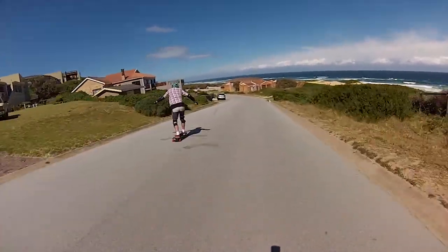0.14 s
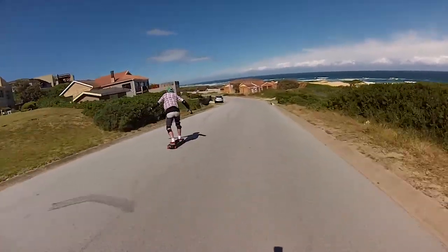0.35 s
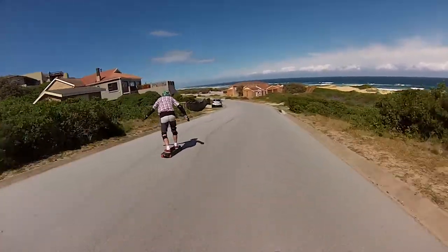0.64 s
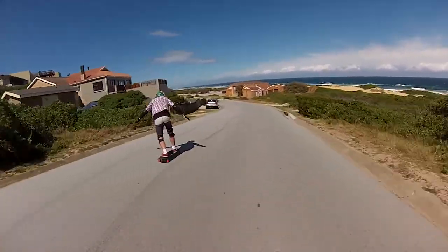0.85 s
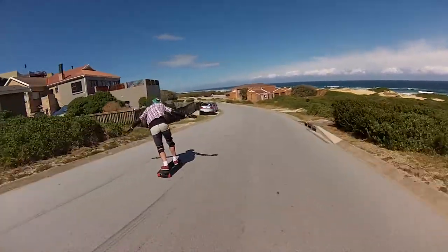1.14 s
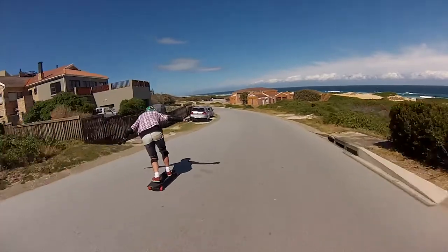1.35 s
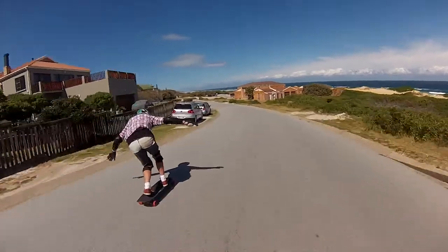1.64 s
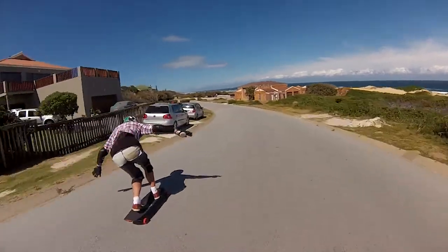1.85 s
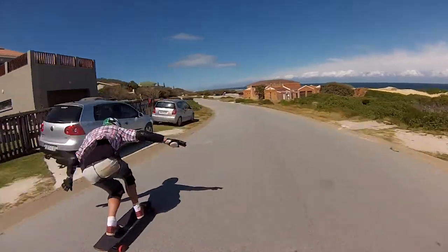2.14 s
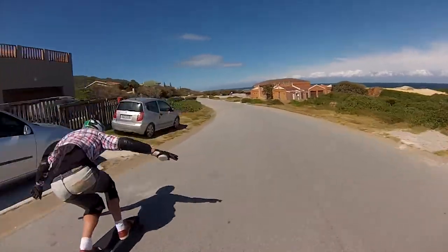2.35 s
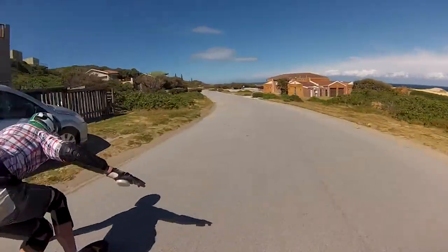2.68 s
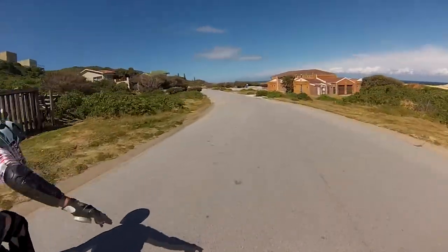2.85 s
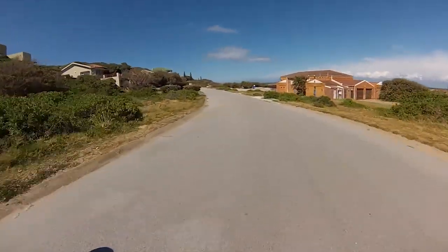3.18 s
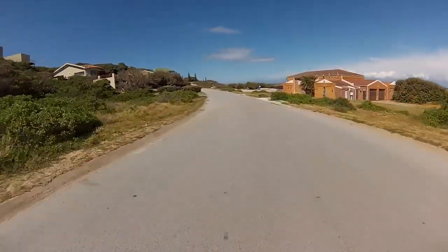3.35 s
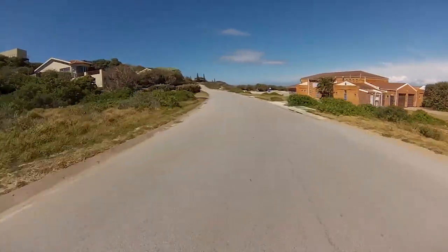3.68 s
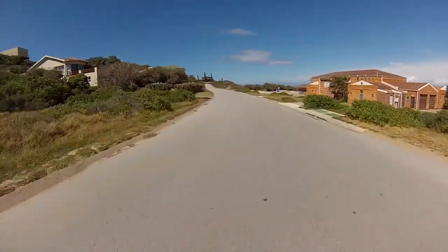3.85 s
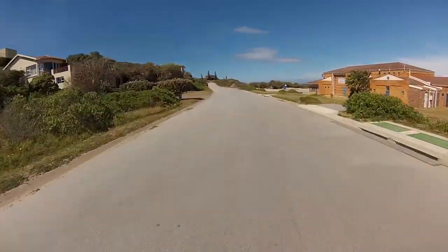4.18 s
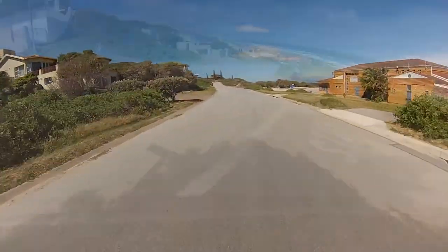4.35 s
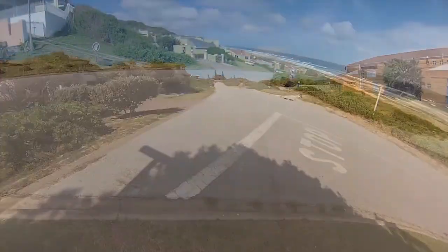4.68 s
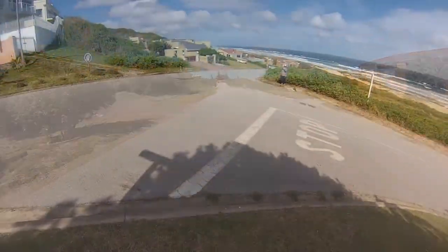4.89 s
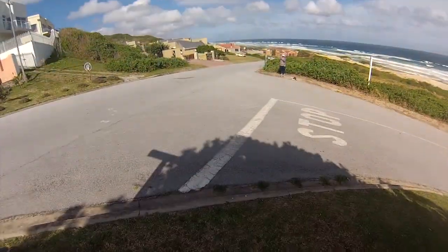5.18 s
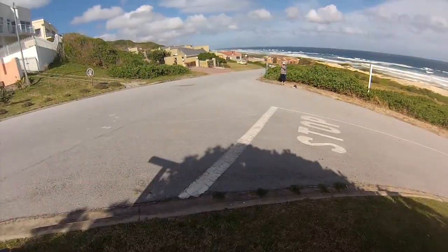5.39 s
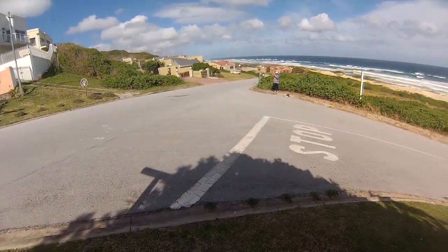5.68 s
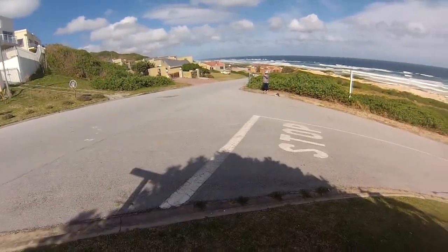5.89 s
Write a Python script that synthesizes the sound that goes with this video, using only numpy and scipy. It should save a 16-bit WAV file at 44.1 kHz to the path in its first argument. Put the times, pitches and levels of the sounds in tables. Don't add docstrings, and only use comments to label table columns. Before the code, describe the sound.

A longboard rumbles and roars over gritty asphalt with buffeting air, then cuts abruptly to a quiet roadside with handling bumps and an approaching board.

```python
import sys
import numpy as np
from scipy import signal
from scipy.fft import rfft, irfft, next_fast_len
from scipy.io import wavfile
from scipy.ndimage import uniform_filter1d

SR = 44100
rng = np.random.default_rng(int(sys.argv[2]) if len(sys.argv) > 2 else 0)


def unload_audio(sound):
    columns = np.transpose(np.atleast_2d(sound))
    steps = np.round(np.clip(columns, -1, 1) * 32767)
    wavfile.write(sys.argv[1], SR, steps.astype(np.int16))


def nominal_scale(level):
    x = np.asarray(level, float) / 20
    return 10 ** x


N = 265482
T = np.arange(N) / SR
SIZE = next_fast_len(N + 8192)
HZ = np.arange(SIZE // 2 + 1) * SR / SIZE + 1e-3
CUT_S = 4.188


def unit(x):
    return x / np.sqrt(np.mean(x ** 2))


def slope(points):
    hz, db = np.transpose(points)
    return nominal_scale(np.interp(np.log(HZ), np.log(hz), db)) ** 2


def ring(peaks, steep=2.):
    return sum(nominal_scale(db) ** 2 / (1 + (2 * (HZ - hz) / width) ** 2) ** steep for hz, width, db in peaks)


def edge(hz, order=4):
    return 1 / (1 + (hz / HZ) ** (2 * order))


def through(x, power):
    ceps = irfft(np.log(power + 1e-14) / 2, SIZE)
    ceps[1:SIZE // 2] *= 2
    ceps[SIZE // 2 + 1:] = 0
    response = np.exp(rfft(ceps))
    return irfft(rfft(x, SIZE) * response, SIZE)[:N]


def walk(rate):
    hold = max(int(SR / rate), 1)
    held = np.repeat(rng.standard_normal(N // 20), hold)[:N]
    return unit(uniform_filter1d(uniform_filter1d(held, hold), hold))


def grit(scatter_db, patchy_db, patch_rate):
    sizes = nominal_scale(scatter_db * rng.exponential(size=N) + patchy_db * walk(patch_rate))
    return unit(sizes * rng.standard_normal(N))


def even(x, share):
    envelope = np.abs(signal.hilbert(x, SIZE)[:N])
    return unit(x / (envelope + 0.94) ** np.clip(share, 0, 1))


def swells(rows, rest_db):
    power = sum(nominal_scale(db) ** 2 * np.exp(-((T - s) / half_s) ** 2) for s, db, half_s in rows)
    return 10 * np.log10(power + nominal_scale(rest_db) ** 2)


def rise(s, rise_s):
    return np.clip((T - s) / rise_s, 0, 1)


def roadside():
    # (frequency [Hz], density [dB per Hz])
    air_colour = [(65, -38), (110, -2.5), (231, -7.5), (271, -13.5), (323, -1), (408, -12.5), (536, -15.5),
                  (1840, -22.5), (2070, -15), (3060, -30), (11800, -34.5), (15300, -73), (22000, -120)]
    # (low edge [Hz], high edge [Hz], swelling [dB])
    bands = [(60, 280, 0.83), (254, 490, 3.3), (450, 1900, 0.47), (1640, 3200, 0.5), (3180, 20000, 0.74)]
    noise, colour = rng.standard_normal(N), slope(air_colour)
    out = 0
    for lo_hz, hi_hz, swell_db in bands:
        band = through(noise, colour * edge(lo_hz, order=6) * (1 - edge(hi_hz, order=6)))
        out = out + band * nominal_scale(swell_db * walk(7))
    return unit(out) * nominal_scale(-54.5) * rise(CUT_S, .02)


def newcomer():
    # (frequency [Hz], density [dB per Hz])
    scrape_colour = [(1120, -50), (1900, -17), (2340, -1), (3050, -8), (3270, -2), (4240, -4), (5170, -0.5),
                     (5840, -13), (6650, -4.5), (8890, -19), (11800, -14), (15300, -56), (22000, -120)]
    # (roll [dB], scrape [dB], spray [dB])
    sliding_db = (-47.5, -43, -54)
    slide_s, flutter_db = 5.865, .8
    ahead_s, loose = T - slide_s, rise(slide_s, .03)
    nearing_db = 11 * ahead_s
    gripping_db = (-56 + nearing_db, -64 + nearing_db, -65.5 + 55 * ahead_s)
    roll_db, slide_db, spray_db = (grip_db + (free_db - grip_db) * loose + flutter_db * walk(20)
                                   for grip_db, free_db in zip(gripping_db, sliding_db))
    scrape = grit(scatter_db=1.4, patchy_db=0.5, patch_rate=70)
    wheels = ring([(1424, 670, -3.5), (580, 250, -11.5), (2450, 630, -12)], steep=2.75)
    colour, high = slope(scrape_colour), edge(6000, order=8)
    roll = unit(through(scrape, wheels)) * nominal_scale(roll_db + 2.5)
    slide = unit(through(scrape, colour * (1 - high))) * nominal_scale(slide_db + 1.0)
    spray = unit(through(scrape, colour * high)) * nominal_scale(spray_db + 5.5)
    return (roll + slide + spray) * rise(CUT_S, .02)


def strokes(grip_share):
    finger_strokes = [
        (4.272, 0.05, -54, -10),
        (4.384, 0.11, -51, -4),
        (4.465, .03, -58, 10),
        (4.51, 0.089, -55, -6),
        (4.58, 0.042, -54, 4),
        (4.625, 0.033, -51.5, 0),
        (4.94, 0.036, -52, 1),
        (4.972, 0.081, -48.5, 4.5),
        (5.118, .07, -56, 3),
    ]
    attack_s, release_s, sag_db_per_s = .02, .035, -26
    out = 0
    for s, hold_s, db, grip_db in finger_strokes:
        level = nominal_scale(db + grip_share * grip_db + sag_db_per_s * (T - s).clip(0, 1))
        out = out + level * rise(s, attack_s) * (1 - rise(s + hold_s, release_s)) ** 2
    return out


def handling():
    # (frequency [Hz], width [Hz], level [dB])
    case_modes = [(334, 40, 6.5), (643, 140, -1.5), (1250, 420, -5), (2020, 330, -0.5), (2540, 170, -5),
                  (3740, 210, -20), (4310, 99, -22), (5320, 140, -24)]
    # (frequency [Hz], density [dB per Hz])
    shell_colour = [(150, -9), (450, -25), (850, -35), (1700, -11), (2900, -9.5), (3400, -28), (5000, -33),
                    (6000, -39), (11000, -61)]
    # (time [s], peak [dB], snap against body [dB], time to fall 60 dB [s], lowest frequency [Hz])
    case_ticks = [
        (4.255, -25, -34, .03, 300),
        (4.266, -34, -8, .014, 1800),
        (4.751, -62, 2, .012, 5000),
        (5.109, -30, -24, .016, 1800),
    ]
    # (time [s], peak [dB], pitch [Hz], half length [s])
    chirp_shape = (4.815, -54, 2050, .016)
    slip = grit(scatter_db=1.5, patchy_db=1.6, patch_rate=54)
    body = ring(case_modes, steep=1.9) + slope(shell_colour)
    low, mid, high = edge(610), edge(1340, order=8), edge(3600, order=8)
    boom = unit(through(slip, body * (1 - low))) * nominal_scale(2.5) * strokes(grip_share=.99)
    hollow = unit(through(slip, body * low * (1 - mid))) * nominal_scale(-0.5 + 1.8 * walk(15)) * strokes(grip_share=.2)
    rub = unit(through(slip, body * mid * (1 - high))) * nominal_scale(1.2 * walk(21.89)) * strokes(grip_share=0)
    squeak = unit(through(slip, body * high)) * nominal_scale(-8.5) * strokes(grip_share=-0.49)
    out = boom + hollow + rub + squeak

    noise = rng.standard_normal(N)
    snap = unit(through(noise, edge(5800)))
    struck = body + nominal_scale(-24) ** 2 * (1 - edge(5600, order=8))
    for s, db, top_db, t60, low_hz in case_ticks:
        burst = unit(through(noise, struck * edge(low_hz)))
        since = (T - s).clip(0)
        out = out + np.clip(since / 0.0012, 0, 1) * nominal_scale(db - 60 * since / t60) * (burst + nominal_scale(top_db) * snap)

    s, db, hz, half_s = chirp_shape
    return out + nominal_scale(db) * np.exp(-((T - s) / half_s) ** 2) * np.sin(2 * np.pi * hz * T)


def mount():
    # (time [s], level [dB], half length [s])
    breeze_puffs = [(4.29, -22.5, 0.073), (4.5, -28, 0.026), (4.63, -30.5, 0.033), (4.79, -31.5, 0.098),
                    (4.98, -29, 0.064), (5.09, -31, 0.023), (5.18, -24.5, 0.026), (5.32, -31.5, 0.055),
                    (5.45, -35.5, 0.11), (5.69, -27.5, 0.061), (5.84, -41, 0.03)]
    # (time [s], level [dB], half length [s])
    hand_jolts = [(4.3, -35, 0.024), (4.52, -29, .03), (4.62, -31, 0.019), (4.95, -33.5, .05),
                  (5.04, -35, 0.055), (5.13, -41, .03), (5.21, -34, 0.022), (5.39, -46, 0.044),
                  (5.57, -48, .02), (5.67, -43.5, 0.034), (5.88, -50, .04)]
    # (time [s], peak [dB], push [s], press [dB], press lead [s])
    knock_shape = (4.2665, -8, .0036, -15, .009)
    sway_db, jolt_db = swells(breeze_puffs, rest_db=-40), swells(hand_jolts, rest_db=-53)
    s, db, push_s, press_db, lead_s = knock_shape
    turns = np.cumsum(28.5 * (1 + 0.054 * walk(14))) / SR
    sway = np.sqrt(2) * np.cos(2 * np.pi * (turns - turns[int(s * SR)])) * rise(CUT_S, 0.1)
    shake = ring([(63.0, 26.3, 0)], steep=1.68) * edge(30)
    jolt = even(unit(through(rng.standard_normal(N), shake)), share=0.58) * rise(CUT_S, .05)
    calm = 1 - np.exp(-((T - s) / .03) ** 2)
    spring_back = nominal_scale(db) * np.exp(-((T - s) / push_s) ** 2)
    press = nominal_scale(press_db) * np.exp(-((T - s + lead_s) / push_s) ** 2)
    return sway * nominal_scale(sway_db) * (0.59 + 0.72 * calm) + jolt * nominal_scale(jolt_db) * calm + spring_back - press


def ride():
    # (frequency [Hz], width [Hz], level [dB])
    board_modes = [(112, 4.1, -8.5), (367, 54, -2.5), (411.7, 39, 7.5), (698, 48.4, 1), (1276, 363, -7.5),
                   (1493, 265, -11), (1950, 186, -11), (2187, 280, -14), (3790, 950, -20.5),
                   (4020, 165, -17), (4530, 120, -21.5), (5150, 170, -14.5), (6200, 170, -21),
                   (10500, 650, -36.5)]
    # (frequency [Hz], density [dB per Hz])
    road_colour = [(60, -8), (110, -3.5), (250, -9), (550, -13.5), (850, -30), (1700, -32.5), (2500, -17.5),
                   (3200, -27), (6000, -23.5), (9000, -31), (11500, -35)]
    # (frequency [Hz], density [dB per Hz])
    gust_colour = [(7.1, -11), (12, -4.5), (45, 4.5), (56, -1.5), (75, -23), (90, -16), (120, -19.5),
                   (200, -120)]
    # (time [s], wheel roar [dB], half length [s], truck ring [dB])
    road_patches = [(0.04, -24.5, 0.079, -30), (0.273, -20, 0.071, -28.5), (0.496, -26, .05, -27.5),
                    (0.689, -16.5, 0.059, -22), (0.842, -21.5, .05, -26.5), (1.032, -19, 0.087, -31.5),
                    (1.185, -22, 0.072, -30), (1.324, -23, 0.071, -41), (1.5, -20, 0.045, -27.5),
                    (1.674, -25, 0.047, -34), (1.83, -22.5, 0.044, -42), (2.01, -26, 0.041, -37),
                    (2.314, -20, 0.062, -27), (2.508, -27.5, 0.044, -27.5), (2.677, -30, 0.025, -32),
                    (2.814, -41, 0.039, -43), (3.085, -25.5, 0.075, -42), (3.38, -21.5, 0.1, -28.5),
                    (3.548, -26.5, 0.046, -32), (3.822, -23, 0.13, -34.5), (4.172, -25.5, 0.045, -48)]
    # (time [s], level [dB], half length [s])
    deck_flexes = [(.0, -26.5, 0.14), (.4, -27.5, 0.024), (.68, -28.5, 0.11), (1.04, -25, 0.036),
                   (1.22, -28, 0.065), (1.34, -23.5, 0.029), (1.48, -25.5, 0.038), (1.65, -23, 0.02),
                   (1.88, -24, 0.056), (2.05, -29.5, 0.13), (2.64, -28.5, 0.043), (2.81, -27.5, 0.047),
                   (3.03, -27, .07), (3.45, -29, 0.12), (3.88, -28, 0.047), (3.99, -26, 0.024)]
    # (time [s], level [dB], half length [s])
    air_buffets = [(.05, -27, .08), (.23, -22, 0.076), (.43, -17.5, 0.048), (.71, -23.5, 0.08),
                   (.85, -17.5, 0.043), (.98, -20, 0.046), (1.2, -16, 0.043), (1.3, -18, 0.034),
                   (1.39, -17, 0.059), (1.54, -13, 0.034), (1.69, -18, 0.023), (1.82, -18.5, 0.046),
                   (2.0, -18.5, 0.037), (2.08, -15.5, 0.029), (2.27, -24, .05), (2.4, -20, 0.035),
                   (2.7, -24, 0.041), (2.85, -35, 0.026), (3.08, -23, 0.075), (3.22, -20, 0.032),
                   (3.38, -19.5, .07), (3.62, -21.5, 0.041), (3.84, -25, .04), (3.97, -26.5, .06)]
    roar_db = swells([patch[:3] for patch in road_patches], rest_db=-23.5 - 0.75 * T)
    truck_db = swells([(s, db, half_s) for s, _, half_s, db in road_patches], rest_db=-41.5)
    deck_db = swells(deck_flexes, rest_db=-31.5)
    wind_db = swells(air_buffets, rest_db=-27)
    hiss_db = roar_db - 13

    stones = grit(scatter_db=2.0, patchy_db=1.0, patch_rate=60)
    body = ring(board_modes, steep=1.517) + slope(road_colour)
    deep, low, mid, high = edge(305, order=6), edge(591, order=8), edge(1031), edge(2750)
    rumble_db = 0.71 * roar_db + 0.045 * wind_db - 15.0 + 2.7 * walk(6.19)
    rumble = unit(through(stones, body * (1 - deep))) * nominal_scale(rumble_db)
    deck = even(unit(through(stones, body * deep * (1 - low))), share=0.11) * nominal_scale(deck_db - 2.14)
    truck = even(unit(through(stones, body * low * (1 - mid))), share=0.1) * nominal_scale(truck_db - 3.5)
    roar = unit(through(stones, body * mid * (1 - high))) * nominal_scale(roar_db + 0.64)
    hiss = unit(through(stones, body * high)) * nominal_scale(hiss_db + 0.31 * walk(25.24))
    wind = even(unit(through(rng.standard_normal(N), slope(gust_colour))), share=0.31) * nominal_scale(wind_db + 1.5)
    return (rumble + deck + truck + roar + hiss + wind) * np.clip((CUT_S - T) / .005, 0, 1)


def scene():
    return (roadside() + newcomer() + handling() + mount() + ride())[None]


def roll_off(x):
    return signal.sosfilt(signal.butter(12, 12190, fs=SR, output="sos"), x)


def record(dry):
    # (frequency [Hz], share [0-1])
    lost_share = [(5000, 0), (8500, .02), (9200, .15), (11500, .11), (11800, .5)]
    hz, _, cells = signal.stft(dry[0], SR, nperseg=1024, noverlap=768)
    band = np.arange(len(hz)) // 3
    stagger = rng.integers(0, 8, len(hz))[band][:, None]
    frame = (np.arange(cells.shape[1]) + stagger) // 8
    chance = rng.random((len(hz), cells.shape[1]))[band[:, None], frame]
    kept = chance > np.interp(hz, *np.transpose(lost_share))[:, None]
    thinned = signal.istft(cells * kept, SR, nperseg=1024, noverlap=768)[1][None, :N]
    low_pass = signal.ellip(14, .3, 70, 11930, fs=SR, output="sos")
    return roll_off(signal.sosfilt(low_pass, thinned))


dry = scene()
out = record(dry)
unload_audio(out)
```